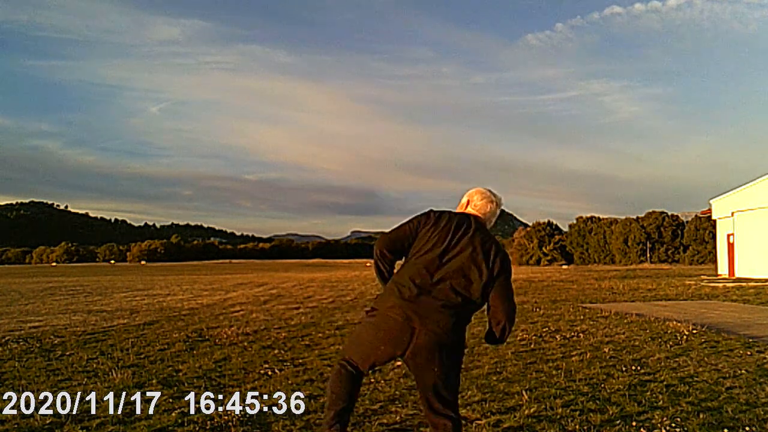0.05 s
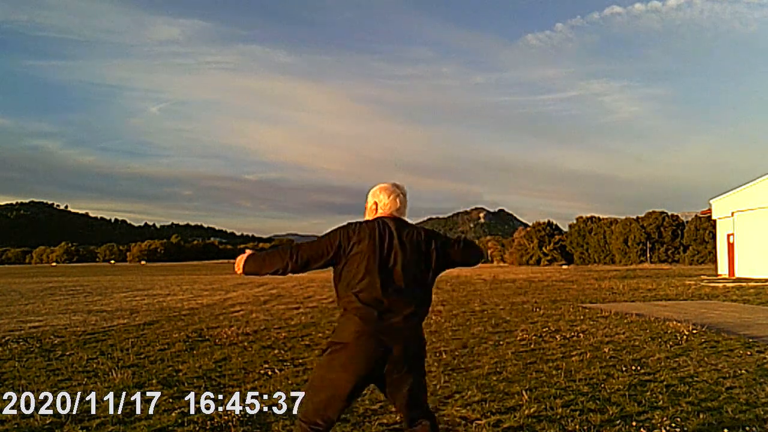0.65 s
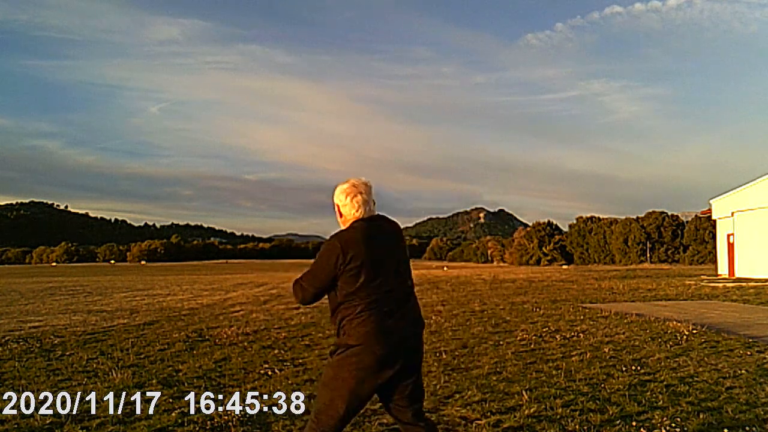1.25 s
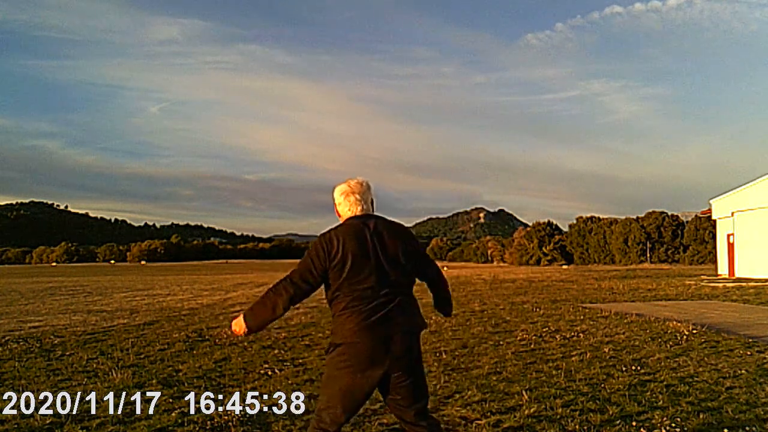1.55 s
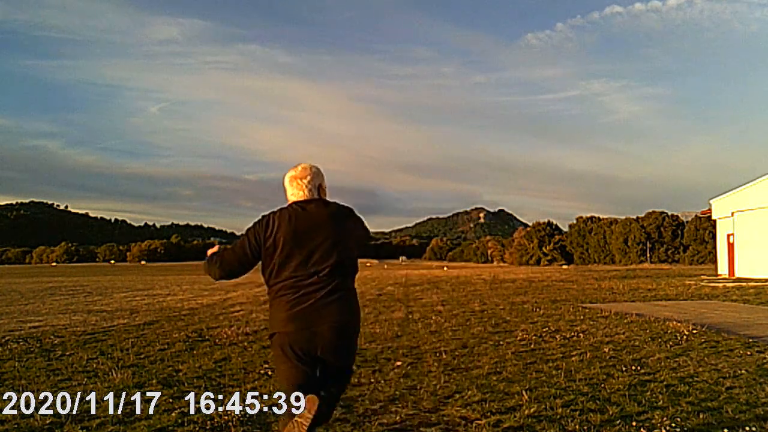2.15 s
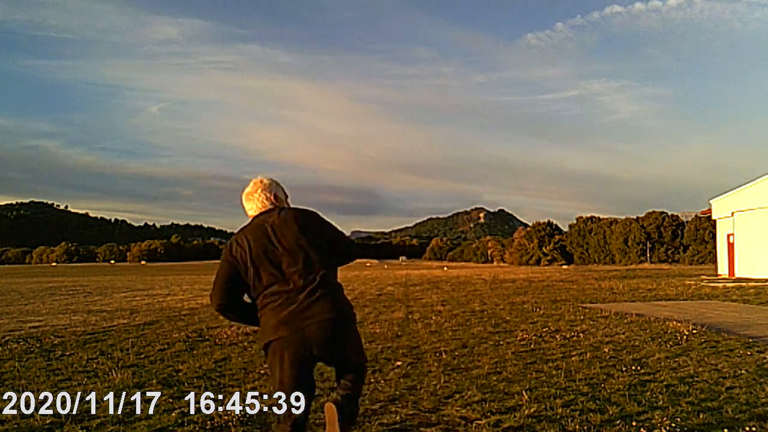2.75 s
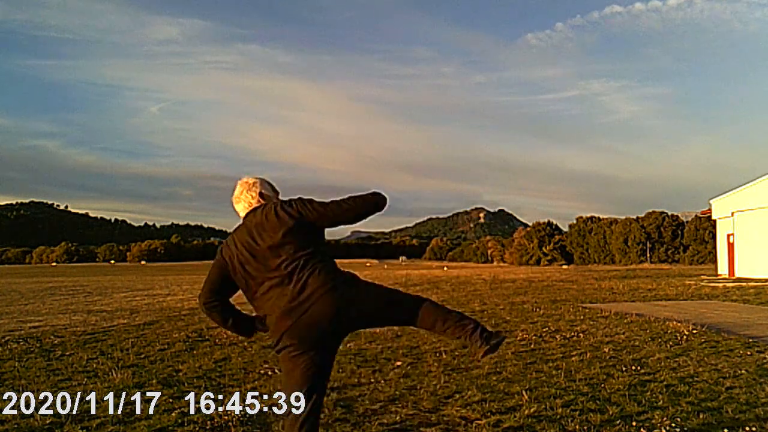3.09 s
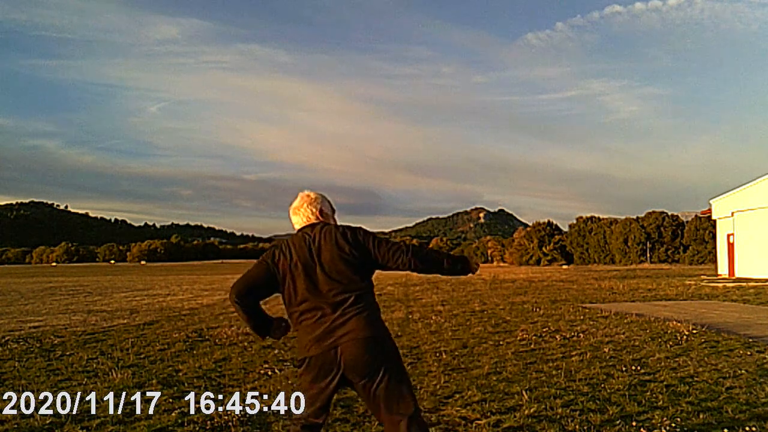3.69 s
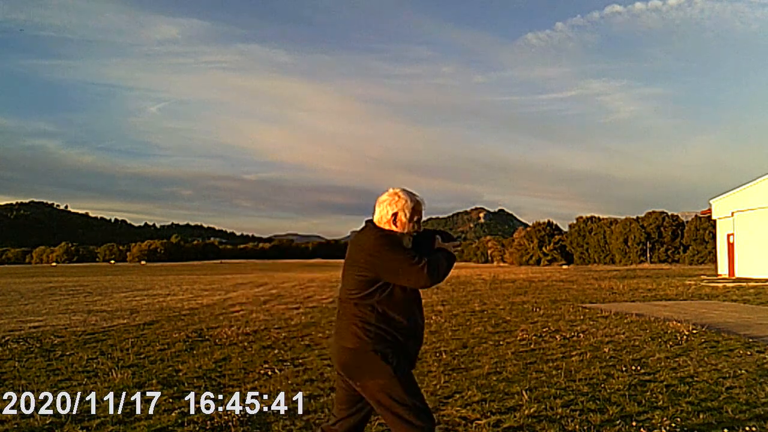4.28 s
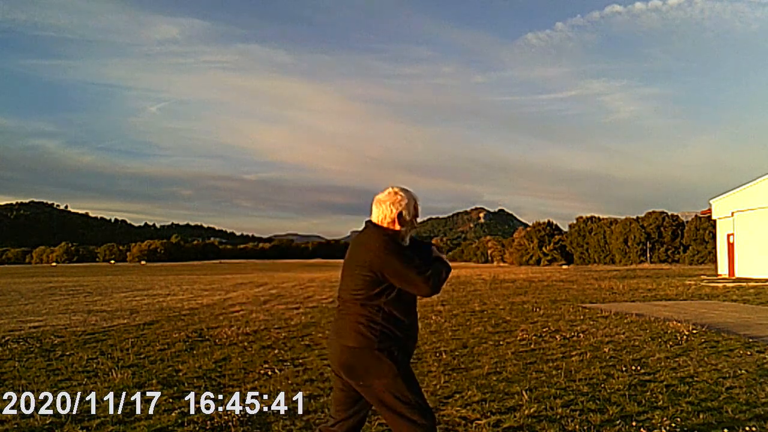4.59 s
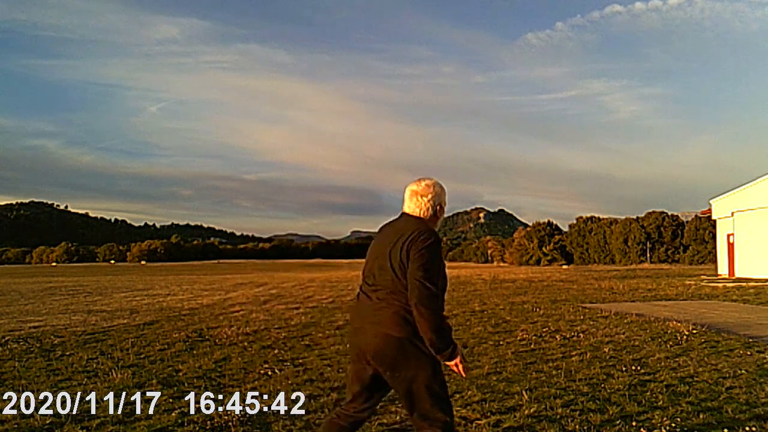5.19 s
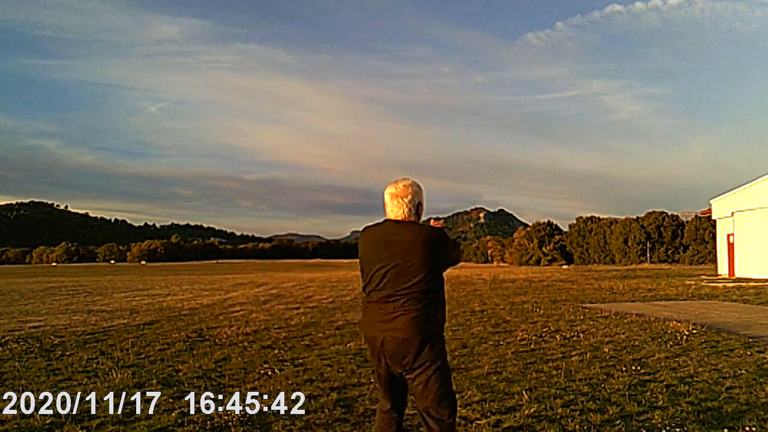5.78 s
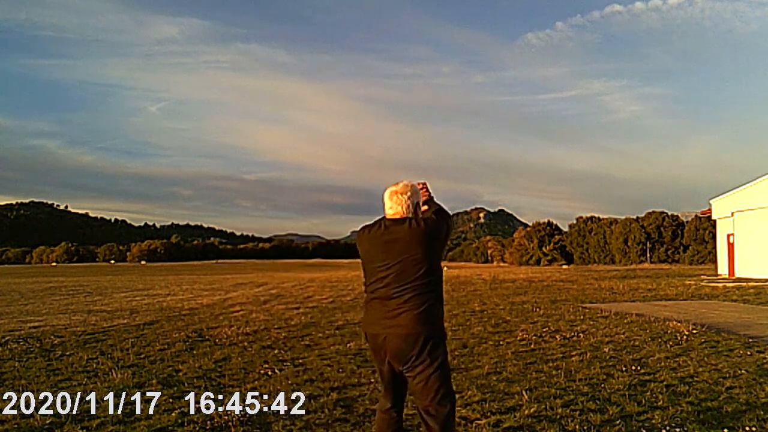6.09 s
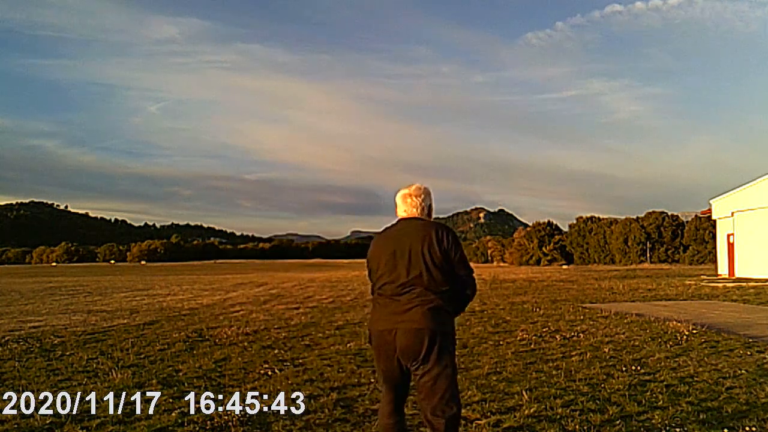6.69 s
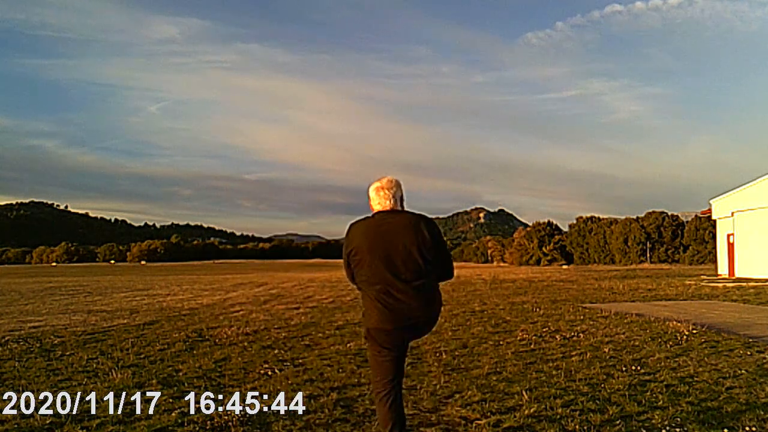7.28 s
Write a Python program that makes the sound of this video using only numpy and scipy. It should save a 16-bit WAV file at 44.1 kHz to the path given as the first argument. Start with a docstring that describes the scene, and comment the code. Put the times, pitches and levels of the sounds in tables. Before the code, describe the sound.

A hollow hand slap, then a brighter crack with a short echo, outdoors against a soft, steady rumble of wind.

```python
"""Two sharp cracks, one hollow, one bright: a martial artist strikes his own arm on an open field.
The hand expels a pulse of air and the skin crackles. Each crack reflects from the ground and from a
shed, whose ribbed walls return echoes at widening intervals, heard as falling chirps.
Behind them are sleeve swishes, three cars on a far road, a distant bird, the faint whine of a machine
and a low breeze."""
import sys
import numpy as np
from scipy import signal
from scipy.fft import rfft, irfft, next_fast_len
from scipy.io import wavfile
from scipy.ndimage import map_coordinates

SR = 44100
rng = np.random.default_rng(int(sys.argv[2]) if len(sys.argv) > 2 else 0)


def output_pcm(signal):
    """Save a mono or channel-first signal as 16-bit PCM at the path in sys.argv[1].

    Samples are clipped to [-1, 1] before scaling.
    """
    pcm = np.clip(np.atleast_2d(signal).T, -1, 1) * 32767
    wavfile.write(sys.argv[1], SR, np.round(pcm).astype(np.int16))


N = 323958

# Hand strikes: t/s, level/dB, ground bounce delay/s, bounce/dB, skin crackle/dB,
# extra delay to the shed/s, shed slap/dB, rib echo/dB (the last four levels are relative to the first)
STRIKES = [(0.8371, 8, .00198, -7, 6.5, 0.00065, -29, -38.5),
           (4.1067, 10, .00212, 1.5, -9.5, 0, -17.5, -31)]
# Spectra of the air pulse under a cupped and a flat hand: f/Hz, level/dB
CUPPED_TONE = [(100, -24), (200, -17.5), (320, -2), (480, 2), (750, -6), (1000, -9.5), (1500, -9.5),
               (2100, -21), (3200, -33.5), (4500, -45), (6800, -42.5), (8300, -50)]
FLAT_TONE = [(100, -16), (220, -10), (320, -1.5), (500, -1), (780, -2.5), (1050, 1), (1450, 3), (1950, -9),
             (2400, -4.5), (3250, -18), (3850, -20), (4600, -28.5), (8000, -22)]
# Spectra of each strike's sharp leading edge: f/Hz, level/dB
CUPPED_EDGE = [(1900, -3), (2800, 4.5), (4000, -1), (5500, -5)]
FLAT_EDGE = [(1900, 3.5), (2800, -4.5), (4000, 1.5), (5000, 2), (7500, 1)]
# Ribbed walls: distance/m, first rib along the wall/m, end of the ribs/m, rib spacing/m, level/dB
RIBBED_WALLS = [(13.6, 4.8, 15, .094, 1), (15.25, 16.5, 37, .223, 1)]
# Scattering response of a rib and of the grass: f/Hz, gain/dB
RIB_TONE = [(500, -8), (1400, 2), (1900, 5), (2800, 4.5), (3900, -4), (4800, -17), (6200, -13), (8500, -15)]
GRASS_TONE = [(300, 6), (1200, 4), (3000, 0.5), (4500, 2.5), (7000, 6)]
# Flat faces of the shed: delay/s, gain/dB, low-pass corner/Hz
SHED_FACES = [(0.0797, 2.5, 3930), (0.1167, -8.5, 990)]
# Decay of the scatter from the grass and from around the shed: f/Hz, T60/s
GRASS_DECAY = [(200, 0.061), (1200, 0.05), (3500, 0.057), (8000, 0.051)]
CLUTTER_DECAY = [(200, 0.45), (1500, 0.33), (4000, 0.17), (8000, 0.34)]
# Sleeve swishes: t/s, level/dB, half-width/s
SWISHES = [(0.376, -65, 0.03), (.65, -70, 0.045), (1.424, -69, 0.027), (3.954, -54.5, 0.0028),
           (4.486, -68, 0.0063)]
# Cars on the far road: t/s, tyre level/dB, fading time/s, brightness (0-1)
CARS = [(2.28, -63, .6, 0.76), (3.58, -53.5, .6, 0.23), (6.4, -64, 1.2, 0)]
# Noise spectra of cloth and of dull and bright tyres: f/Hz, relative level/dB
CLOTH_TONE = [(500, -14), (1500, 4), (2400, 3), (3300, -5), (4500, -29), (8000, -18)]
TYRES_DULL = [(700, -38), (950, -0.5), (1130, 5), (1350, -2), (1700, -13), (2100, -45.5)]
TYRES_BRIGHT = [(800, -30), (1100, -8), (1400, 0), (1700, -5), (2000, -24), (3200, -32), (5000, -51.5)]
# Bird notes: t/s, duration/s, start f/Hz, end f/Hz, level/dB
BIRD_NOTES = [(3.45, .07, 4600, 4200, -87), (5.6, .05, 5700, 4600, -88), (5.65, .08, 4400, 3050, -82),
              (5.71, .13, 4300, 2450, -79.5), (6.33, .05, 5300, 4200, -88), (6.39, .04, 3200, 3700, -82),
              (6.44, .05, 4000, 3200, -81)]
# Swells of the whine as the air carries it over, and a lull in the breeze: t/s, change/dB, half-width/s
WHINE_SWELLS = [(1.35, 5, 1.1), (6.75, 6, .9)]
BREEZE_LULLS = [(1.34, -3.5, 0.73)]
# Noise spectra of the breeze, the open air and microphone hiss: f/Hz, relative level/dB
BREEZE_TONE = [(7.1, -33), (12, -2.5), (20, 4), (48, -8), (70, -5), (124, -15), (170, -19.5), (220, -24.5),
               (290, -49.5), (480, -120)]
AIR_TONE = [(90, -30.5), (150, -6), (270, -3.5), (400, -8.5), (530, -11.5), (720, -10.5), (900, -16),
            (1200, -16.5), (2400, -27.5), (3300, -34.5), (4400, -44), (5300, -49), (7400, -50),
            (8400, -49.5)]
HISS_TONE = [(4000, -40), (5300, -15), (6200, -5.5), (7400, -1.5), (8100, -6.5), (8600, -8)]


def hand_strikes(grass_db=-19):
    """Superposition: each crack is heard directly and by reflection from the ground and the shed."""
    out = np.zeros(N)
    ribs = rib_echoes()
    slap = shed_slap()
    for strike, tone, edge in zip(STRIKES, (CUPPED_TONE, FLAT_TONE), (CUPPED_EDGE, FLAT_EDGE)):
        s, db, bounce_s, bounce_db, crackle_db, extra_s, slap_db, rib_db = strike
        crack = amp(db) * hand_crack(tone, crackle_db)
        # the ground bounce interferes with the direct sound and combs its spectrum
        near = taps([0, bounce_s], [1, amp(bounce_db)]) + amp(grass_db) * grass_scatter()
        add(out, s, signal.fftconvolve(crack, near))
        add(out, s + extra_s, amp(slap_db) * signal.fftconvolve(crack, slap))
        # the narrow ribs return only the sharp edge of the crack
        add(out, s + extra_s, amp(db + rib_db) * coloured(ribs, edge))
    return out


def hand_crack(tone, crackle_db, rise_s=0.00049, t60_s=0.012, highpass_hz=1900):
    """Impact: trapped air leaves as a pulse; skin meets skin bit by bit, spreading the treble in time."""
    air_pulse = pulse(tone)
    t = np.arange(len(air_pulse)) / SR
    contacts = rng.standard_normal(len(t)) * (1 - np.exp(-t / rise_s)) * amp(-60 * t / t60_s)
    contacts /= np.linalg.norm(contacts)
    crackle = filtered(contacts, lambda hz: hz ** 4 / (hz ** 4 + highpass_hz ** 4))
    return signal.fftconvolve(air_pulse, (t == 0) + amp(crackle_db) * crackle)


def rib_echoes(uneven_db=3.5, crooked_m=.0035):
    """Repetition pitch: echoes of successive ribs arrive ever further apart, so the pitch falls."""
    ribs = np.zeros(SR // 2)
    for distance, first, end, spacing, db in RIBBED_WALLS:
        path = np.hypot(distance, np.arange(first, end, spacing))
        size, offset = rng.standard_normal((2, SR // 2))[:, :len(path)]
        shading = np.sqrt(np.linspace(1, 0, len(path)))  # far ribs shade one another
        gain = shading * amp(uneven_db * size) / path ** 2
        delay = 2 * (path + crooked_m * offset) / 343  # out and back at the speed of sound
        ribs += taps(delay, amp(db) * gain / np.linalg.norm(gain))
    return coloured(ribs, RIB_TONE)


def shed_slap(clutter_db=-12):
    """Specular reflection: each flat face returns one dulled slap, trailed by scatter from around it."""
    slaps = sum(filtered(taps([s], [amp(db)]), lambda hz: 1 / (1 + 1j * hz / corner_hz))
                for s, db, corner_hz in SHED_FACES)
    clutter = signal.fftconvolve(slaps, diffuse_tail(CLUTTER_DECAY))[:len(slaps)]
    return slaps + amp(clutter_db) * clutter


def grass_scatter():
    """Diffuse scattering: the blades all around return a brief wash of sound."""
    return coloured(diffuse_tail(GRASS_DECAY), GRASS_TONE)


def sleeves():
    """Friction noise: cloth swishes in short bursts as the arms whip round."""
    return noise(CLOTH_TONE) * sum(amp(db) * hump(s, half) for s, db, half in SWISHES)


def cars(emerge_s=0.19, brighten=0.29, brighten_s=.45, waver_db=1.5):
    """Inverse-square law: tyre noise emerges, brightens as a car draws level and fades with distance."""
    t = np.arange(N) / SR
    dull_power, bright_power = np.zeros((2, N))
    for s, db, fade_s, brightness in CARS:
        emerged = .5 + .5 * np.tanh((t - s) / (2 * emerge_s))
        power = (amp(db) * emerged) ** 2 / (1 + ((t - s) / fade_s) ** 2)
        bright_share = np.clip(brightness + brighten * np.tanh((t - s) / brighten_s), 0, 1)
        dull_power += (1 - bright_share) * power
        bright_power += bright_share * power
    tyres = np.sqrt(dull_power) * noise(TYRES_DULL) + np.sqrt(bright_power) * noise(TYRES_BRIGHT)
    return amp(waver_db * wobble(7.2)) * tyres


def bird(flutter_rate=300):
    """Random amplitude modulation: faint gliding notes are blurred by distance."""
    notes = np.zeros(N)
    for s, length, start_hz, end_hz, db in BIRD_NOTES:
        hz = np.geomspace(start_hz, end_hz, int(length * SR))
        add(notes, s, amp(db) * 2 * np.hanning(len(hz)) * sine(hz))
    return notes * wobble(flutter_rate)


def machine(whine_hz=533, whine_db=-67, drone_hz=175, drone_db=-63.5):
    """Atmospheric fading: a far machine's thin whine swells on the air above a wavering low drone."""
    whine = np.sqrt(2) * sine(whine_hz + 1.2 * wobble(14))
    drone = sine(drone_hz + 3 * wobble(9))
    whine *= amp(whine_db + swells(WHINE_SWELLS) + .6 * wobble(2.1))
    drone *= amp(drone_db + 2.2 * wobble(1.6))
    return whine + drone


def background(breeze_db=-41.5, air_db=-57, hiss_db=-79):
    """Incoherent noises add in power: a rumbling breeze, the wash of open air and microphone hiss."""
    breeze = amp(breeze_db + swells(BREEZE_LULLS) + 0.59 * wobble(5.5)) * noise(BREEZE_TONE)
    air = amp(air_db + 0.52 * wobble(2.5)) * noise(AIR_TONE)
    return breeze + air + amp(hiss_db) * noise(HISS_TONE)


def diffuse_tail(decay, rise_s=0.005):
    """Exponential decay: a noise tail of energy 1 in which each frequency dies at its own rate."""
    hz, t, spectra = signal.stft(rng.standard_normal(SR // 2), SR, nperseg=128)
    spectra *= amp(-60 * t / along(decay, hz)[:, None])
    tail = signal.istft(spectra, SR, nperseg=128)[1][:SR // 2]
    tail *= 1 - np.exp(-np.arange(len(tail)) / SR / rise_s)
    return tail / np.linalg.norm(tail)


def pulse(spectrum, size=2048):
    """Minimum phase: the shortest causal pressure pulse with this spectrum, of energy 1."""
    magnitude = amp(along(spectrum, np.fft.rfftfreq(size, 1 / SR)))
    cepstrum = irfft(np.log(magnitude))
    cepstrum[1:size // 2] *= 2
    cepstrum[size // 2 + 1:] = 0
    pressure = irfft(np.exp(rfft(cepstrum)))
    return pressure / np.linalg.norm(pressure)


def taps(delays, gains):
    """Sinc interpolation: echo paths become impulses placed between samples."""
    at = np.asarray(delays)[:, None] * SR
    index = np.floor(at).astype(int) + np.arange(-7, 9)
    weight = np.sinc(index - at) * np.sinc((index - at) / 8) * np.asarray(gains)[:, None]
    return np.bincount(np.maximum(index, 0).ravel(), weight.ravel(), SR // 2)[:SR // 2]


def filtered(x, response):
    """Linear filtering: the spectrum of x times a response of frequency."""
    size = next_fast_len(len(x) + SR // 4)
    return irfft(rfft(x, size) * response(np.fft.rfftfreq(size, 1 / SR)), size)[:len(x)]


def coloured(x, spectrum):
    """Spectral shaping by a table of f/Hz, gain/dB."""
    return filtered(x, lambda hz: amp(along(spectrum, hz)))


def noise(spectrum):
    """Coloured Gaussian noise of rms 1."""
    x = coloured(rng.standard_normal(N), spectrum)
    return x / np.sqrt(np.mean(x ** 2) + 1e-20)


def sine(hz):
    """A sinusoid whose phase is the integral of its frequency."""
    return np.sin(2 * np.pi * np.cumsum(hz) / SR)


def wobble(rate):
    """A smooth random curve with rate knots a second."""
    return map_coordinates(rng.standard_normal(int(N * rate / SR) + 4), [np.arange(N) * rate / SR])


def hump(s, half_width):
    """A Gaussian envelope centred on time s."""
    return np.exp(-((np.arange(N) / SR - s) / half_width) ** 2)


def swells(rows):
    """A level change in dB, one hump a row."""
    return sum(db * hump(s, half) for s, db, half in rows)


def along(points, hz):
    """Interpolation of (f/Hz, value) points on a logarithmic frequency axis."""
    f, value = np.transpose(points)
    return np.interp(np.log(hz + 1), np.log(f + 1), value)


def amp(db):
    return 10 ** (np.asarray(db) / 20)


def add(track, s, sound):
    """Superpose a sound on the track at time s."""
    part = track[round(s * SR):][:len(sound)]
    part += sound[:len(part)]


def scene():
    """Superposition: the pressures of all sources sum in one channel."""
    return (hand_strikes() + sleeves() + bird() + cars() + machine() + background())[None]


def record(dry, ceiling=.68, top_hz=8200):
    """Saturation flattens the highest peaks, and a steep low-pass limits the band."""
    saturated = dry / (1 + np.abs(dry / ceiling) ** 8) ** (1 / 8)
    return signal.sosfilt(signal.butter(36, top_hz, fs=SR, output="sos"), saturated)


dry = scene()
out = record(dry)
output_pcm(out)
```